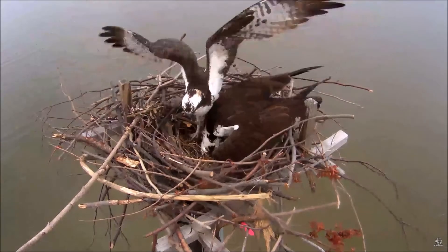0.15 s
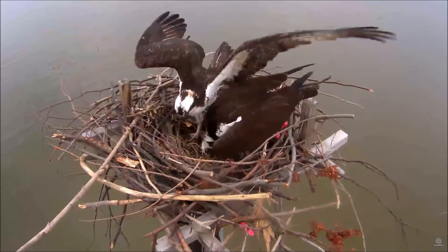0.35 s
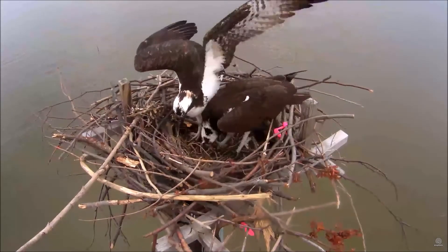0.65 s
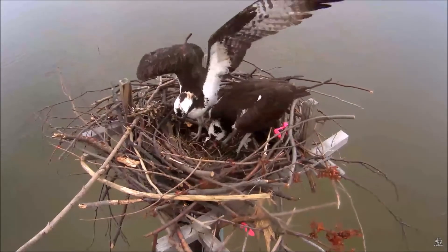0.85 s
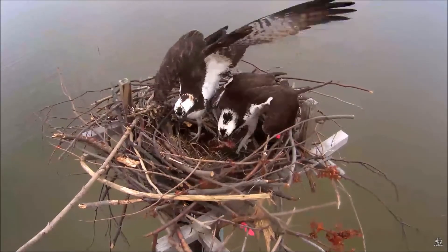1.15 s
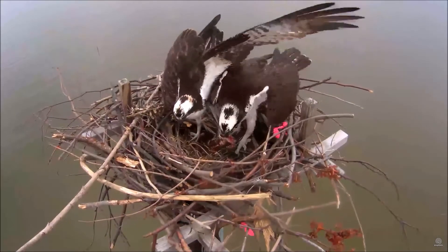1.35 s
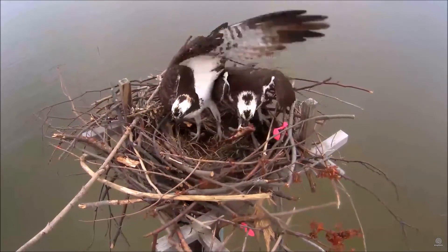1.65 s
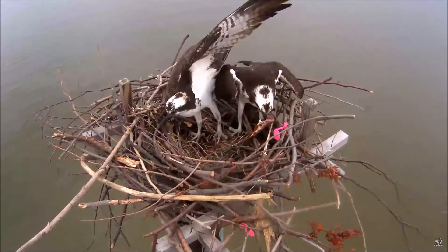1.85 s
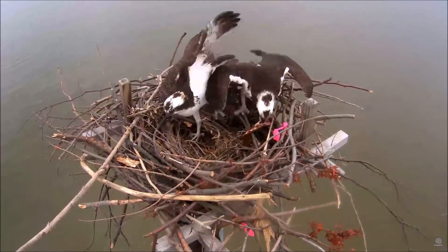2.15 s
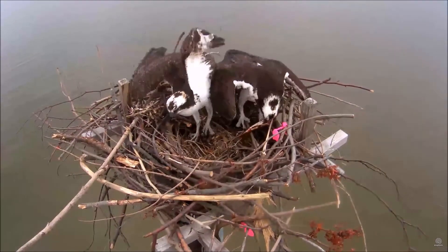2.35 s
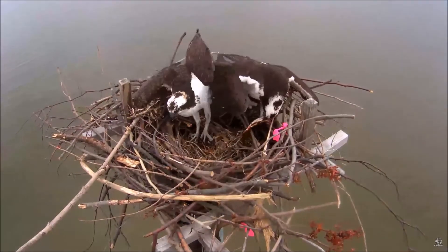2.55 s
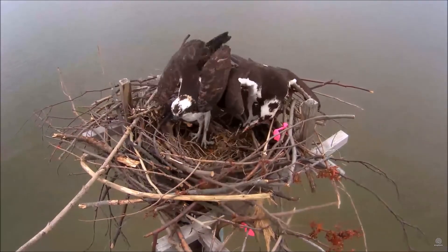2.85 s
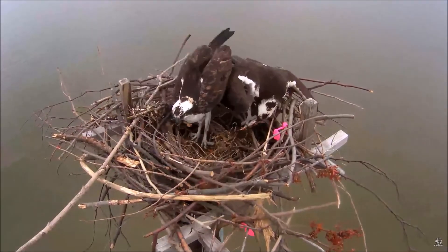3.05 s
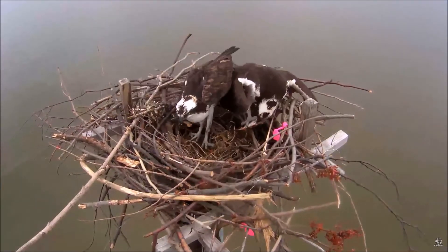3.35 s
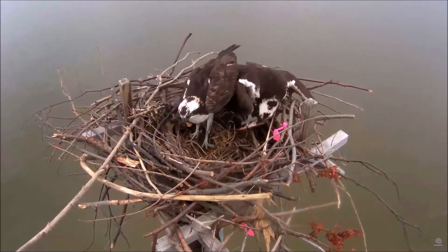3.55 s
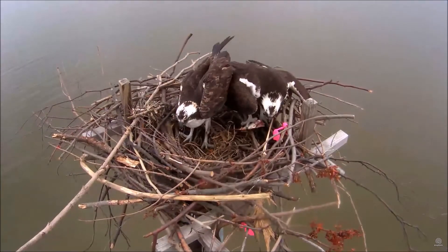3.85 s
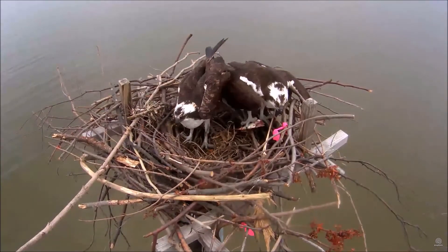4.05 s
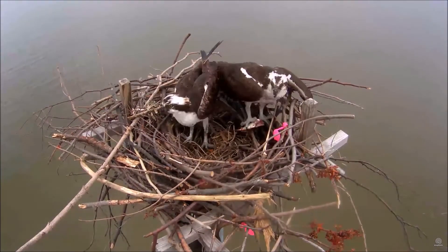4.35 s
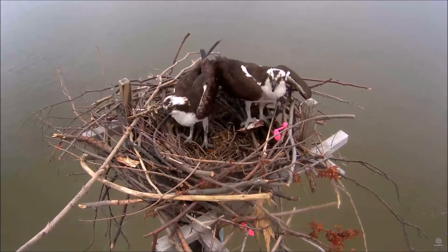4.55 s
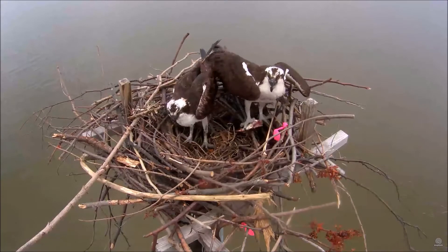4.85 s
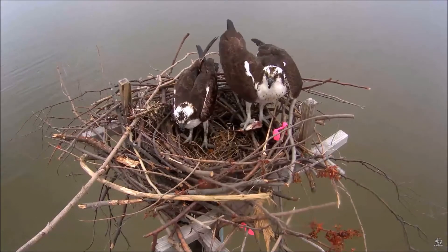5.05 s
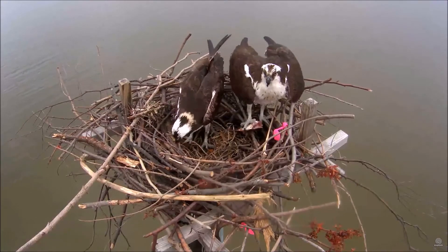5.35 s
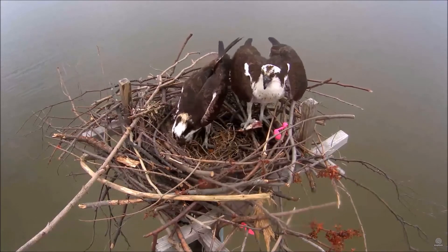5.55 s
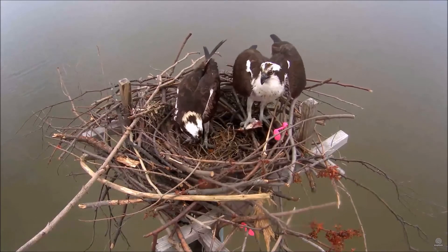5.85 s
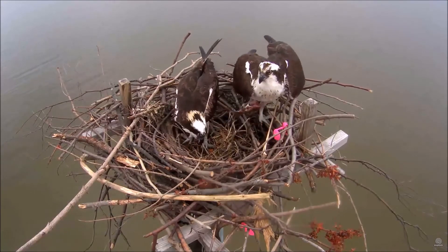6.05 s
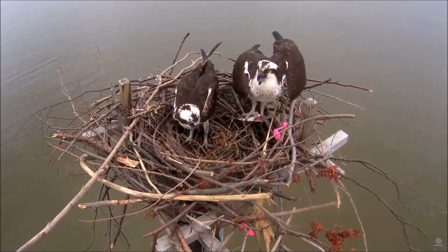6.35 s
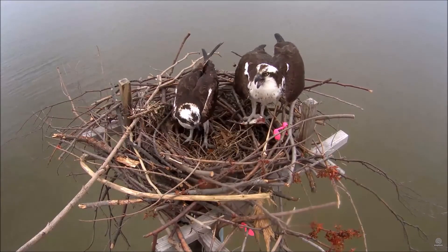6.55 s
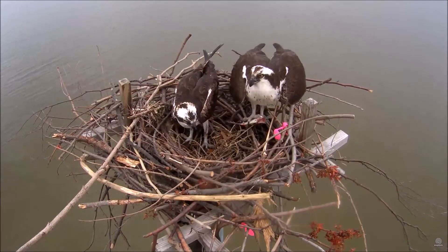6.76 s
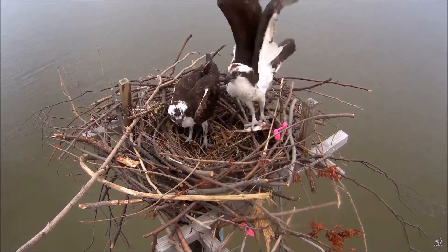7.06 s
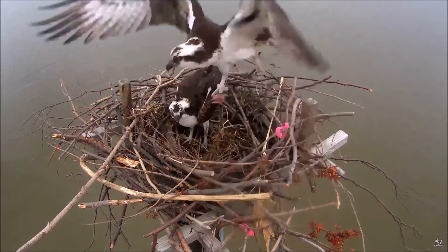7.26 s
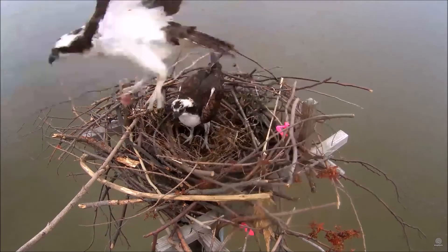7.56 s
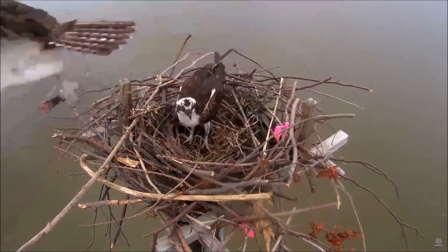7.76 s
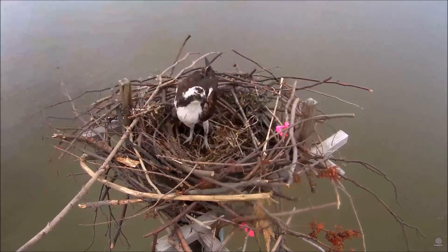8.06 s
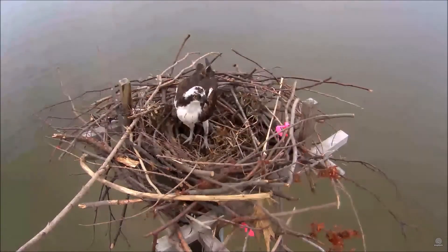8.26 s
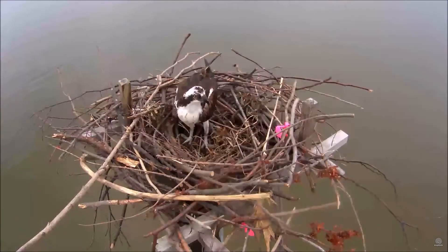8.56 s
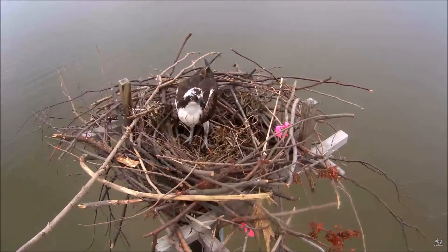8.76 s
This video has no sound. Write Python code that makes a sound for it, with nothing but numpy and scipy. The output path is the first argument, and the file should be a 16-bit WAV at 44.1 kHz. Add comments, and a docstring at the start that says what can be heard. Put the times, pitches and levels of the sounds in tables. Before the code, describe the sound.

Close to a stick nest over open water, an osprey gives faint raspy croaks and broken, squeaky chirps with short falling chips. Three long piercing whistles then climb in pitch, the first briefly chopped by two dropouts. A broken note follows, then hollow thumps as a bird takes off, and a weak final chirp. Sticks rustle throughout over soft hiss.

```python
"""Raspy croaks and broken chirps of an osprey open the scene, on a stick nest on a pole over open water.
From 4.6 s come three long rising whistles; during the first the whole sound cuts out twice, a stream
glitch. Broken notes and chips close it. The voice is summed partials, with breath noise coloured by fixed
resonances of the microphone housing, heard with its echoes. All along, feet and wings shake the nest:
noise bursts ring the modes of the hollow mount. A band-limited hiss of water and microphone lies below."""
import sys
import numpy as np
from scipy import signal
from scipy.fft import rfft, irfft, next_fast_len
from scipy.io import wavfile
from scipy.ndimage import uniform_filter1d, map_coordinates

SR = 44100
rng = np.random.default_rng(int(sys.argv[2]) if len(sys.argv) > 2 else 0)


def output_pcm(signal):
    """Save a mono or channel-first signal as 16-bit PCM at the path in sys.argv[1].

    Samples are clipped to [-1, 1] before scaling.
    """
    pcm = np.clip(np.atleast_2d(signal).T, -1, 1) * 32767
    wavfile.write(sys.argv[1], SR, np.round(pcm).astype(np.int16))


def volts_from_db(level):
    """Convert decibel levels to linear amplitude ratios."""
    exponent = np.asarray(level, float) / 20
    return 10 ** exponent


N = 393350  # samples

# Levels in the tables are drive levels, before flutter, shaping and mix gains.
# long rising whistles, breakpoints per note: start_s, pitch_hz, second_partial_db
RISING_NOTES = [
    [(4.597, 2223, -75), (4.606, 2236, -51), (4.624, 2295, -52), (4.639, 2387, -29), (4.737, 2557, -38.5),
     (4.759, 2596, -25), (4.78, 2650, -29), (4.847, 2745, -22.5), (4.905, 2803, -25), (4.947, 2785, -24),
     (4.958, 2720, -16.5), (4.97, 2610, -31), (4.993, 2560, -80)],
    [(5.628, 2240, -70), (5.637, 2250, -45), (5.648, 2335, -36), (5.67, 2400, -39), (5.74, 2588, -30),
     (5.804, 2686, -24.5), (5.842, 2745, -22), (5.898, 2793, -35), (5.958, 2824, -30.5), (5.975, 2796, -36),
     (5.985, 2720, -18), (5.997, 2615, -29), (6.02, 2560, -74)],
    [(6.402, 2270, -80), (6.414, 2350, -36.5), (6.434, 2480, -34.5), (6.47, 2535, -27), (6.5, 2540, -37),
     (6.526, 2629, -28.5), (6.592, 2732, -26.5), (6.608, 2767, -39.5), (6.632, 2792, -31),
     (6.698, 2869, -30), (6.726, 2854, -28), (6.735, 2780, -36), (6.741, 2730, -20), (6.75, 2620, -44),
     (6.77, 2620, -72)],
]
# basic fundamental level of each rising whistle: level_db
RISING_STRENGTH = [-23.5, -22, -22]
# how the fundamental carries, with a narrow dip, perhaps a cancelling reflection: pitch_hz, level_db
PITCH_CARRY = [(2230, -30), (2400, -18), (2500, -9), (2590, -3), (2630, -5), (2680, 0), (2720, -4),
               (2760, -13), (2790, 1), (2815, -1.5), (2860, -.6)]
# broken, wandering notes, breakpoints per note: start_s, pitch_hz, fundamental_db, second_partial_db
BROKEN_NOTES = [
    [(1.88, 2847, -47, -54), (1.888, 2873, -40, -40), (1.912, 2905, -34, -45), (1.968, 2904, -38, -45),
     (2.02, 2960, -35, -29), (2.132, 2996, -38, -36), (2.168, 3108, -27, -53), (2.172, 3161, -27, -68),
     (2.182, 3193, -26, -52), (2.196, 3194, -26, -65), (2.206, 3215, -33, -61), (2.212, 3188, -42, -70)],
    [(3.61, 2590, -68, -85), (3.622, 2625, -23.5, -30), (3.65, 2675, -19, -27.5), (3.832, 2717, -26.5, -28),
     (3.856, 2800, -29, -31), (3.868, 2825, -39, -32), (3.908, 2825, -40, -37), (3.926, 2787, -28, -25.5),
     (3.942, 2740, -23.5, -23.5), (3.96, 2655, -22, -40), (3.967, 2700, -44, -53), (3.98, 2750, -55, -68)],
    [(7.024, 2283, -75, -75), (7.036, 2347, -46, -32), (7.06, 2500, -31, -36.5),
     (7.084, 2552, -26.5, -28.5), (7.124, 2555, -30.5, -31.5), (7.15, 2660, -27, -25),
     (7.171, 2695, -23.5, -21.5), (7.177, 2800, -32.5, -42), (7.192, 2790, -28, -29), (7.2, 2780, -50, -52),
     (7.212, 2710, -29, -18.5), (7.223, 2685, -25, -16.5), (7.23, 2690, -31.5, -37),
     (7.236, 2640, -30, -19), (7.242, 2520, -30, -34), (7.26, 2480, -50, -52)],
    [(2.722, 2772, -46, -63), (2.73, 2771, -35, -42), (2.74, 2841, -41, -41), (2.824, 2824, -46, -44),
     (2.868, 2784, -35, -48), (2.89, 2860, -50, -59), (2.898, 2901, -42, -80), (2.918, 3161, -47, -49),
     (2.925, 3160, -49, -56)],
    [(1.203, 3130, -61, -85), (1.217, 3200, -31, -61), (1.225, 3010, -47, -59), (1.232, 2940, -37, -57),
     (1.251, 2890, -36.5, -60), (1.271, 3040, -38.5, -42), (1.283, 3190, -44, -70),
     (1.305, 3180, -38.5, -69), (1.339, 3380, -74, -48)],
    [(0, 2650, -31, -58), (.008, 2560, -35.5, -46), (.014, 2560, -46, -55), (.03, 2580, -66, -88)],
    [(1.095, 2390, -58, -85), (1.105, 2490, -32, -39), (1.113, 2670, -36.5, -32.5),
     (1.119, 2702, -45, -41.5), (1.127, 2810, -32, -62), (1.137, 2800, -56, -73)],
    [(8.085, 2272, -66, -81), (8.105, 2300, -47, -66), (8.128, 2420, -35, -52), (8.14, 2470, -32, -62),
     (8.155, 2474, -31.5, -52), (8.177, 2440, -30.5, -55), (8.2, 2460, -36, -64), (8.211, 2430, -61, -79)],
    [(2.213, 3450, -52, -75), (2.22, 3420, -43, -66), (2.237, 3505, -57, -73), (2.26, 3740, -50, -75),
     (2.293, 4040, -42, -90), (2.307, 3800, -47, -81), (2.323, 3520, -55, -75)],
    [(2.922, 3150, -52, -55), (2.936, 3200, -61, -66), (2.97, 3870, -58, -79)],
]
# short chips, most of them falling: start_s, length_s, from_hz, to_hz, level_db, second_over_first_db
CLOSING_CHIPS = [(.887, .046, 2730, 2530, -29, -6), (1.453, .024, 3080, 2850, -33, -18),
                 (1.474, .048, 2830, 2620, -25, 0), (2.334, .04, 2740, 2650, -24, -11),
                 (3.118, .024, 2950, 2950, -35, -18), (3.136, .052, 2920, 2600, -22, -3),
                 (8.226, .08, 2570, 2480, -35, -6)]
# shape shared by all chips: share_of_length, share_of_glide, fundamental_db, second_partial_db
CHIP_CONTOUR = [(0, 0, -25, -30), (.2, .22, -4, -3), (.42, .62, 0, 0), (.57, 1, -1, -12),
                (.72, .9, -21, -30), (1, .7, -38, -48)]
# third partial over the second: third_partial_hz, level_db
THIRD_OVER_SECOND = [(6600, -16.5), (7100, -7), (7500, -22.5), (8000, -31), (8600, -54.5)]
# lines of a membrane that repeats only every fourth cycle: multiple_of_pitch, level_db over the rattle
RATTLE_LINES = [(.75, -5), (1.25, -12), (1.5, -14), (1.75, -2), (2.25, -7), (2.5, -10), (2.75, -12)]
# rattle over the low breath band, for each rising whistle, each broken note, then all chips: level_db
RATTLE_LEVELS = [1, 2, 4, -6, 1, 7, -7, -6, 0, -3, 0, -8, -10, -4]
# notes in the low register, breakpoints per note: start_s, pitch_hz, second_partial_db, third_partial_db
LOW_CROAKS = [
    [(0.125, 1719, -70, -60), (0.15, 1840, -46, -57), (0.231, 1820, -52.5, -55), (0.317, 1990, -50, -50),
     (0.383, 1997, -58, -42), (0.415, 1700, -59, -58.5)],
    [(0.565, 1810, -64, -82), (0.587, 1700, -63, -50), (0.629, 1700, -54.5, -57.5),
     (0.66, 1670, -69.5, -70.5)],
    [(0.68, 1800, -50, -66), (0.715, 1800, -50, -58), (0.752, 1820, -39.5, -49.5), (0.842, 1890, -49, -53),
     (0.868, 1870, -46, -55), (0.895, 1735, -48.5, -52)],
    [(1.128, 1810, -44, -65), (1.142, 1870, -25, -47), (1.176, 1834, -37.5, -42), (1.205, 1775, -61, -59)],
    [(1.86, 1970, -75, -88), (1.87, 2030, -44, -70), (1.884, 2160, -51, -83.5)],
    [(2.312, 2346, -53, -72.5), (2.324, 2377, -35.5, -72), (2.336, 2400, -44, -66)],
    [(2.703, 2007, -69, -78), (2.71, 2016, -43.5, -62), (2.727, 2090, -55, -77)],
    [(2.955, 1960, -61, -77), (2.99, 1995, -41, -66), (3, 2015, -32, -63), (3.1, 1975, -35, -58),
     (3.115, 1950, -30, -56), (3.133, 1915, -29, -58), (3.142, 1930, -53.5, -44)],
    [(8.193, 1984, -61, -73), (8.231, 2062, -51.5, -78), (8.247, 2090, -62, -73), (8.265, 2063, -75, -80)],
]
# fundamental of each croak over its second partial: level_db
CROAK_CHOKE = [-35, -35, -45, -50, 11, -6, 6, -40, 11]
# phase unsteadiness of each croak: smear_rad
CROAK_HOARSENESS = [1, .9, .3, .2, .1, .1, .1, .2, .1]
# turbulent breath: start_s, length_s, low_band_end_db, swell_db, middle_over_low_db, high_over_low_db
BREATHS = [(.13, .29, -71, 5, 16, 20), (.57, .09, -80, 0, 21, 16), (.705, .2, -69, -2, 9, 5),
           (1.095, .04, -66, 0, 5, 0), (1.12, .125, -61, -10, 11, -1), (1.225, .12, -72, 0, 5, 8),
           (1.33, .19, -60, 2, 8, 4), (1.865, .35, -54, 3, 9, -6), (2.195, .17, -63, 3, 17, 3),
           (2.715, .255, -58, 0, 8, 2), (2.95, .17, -50, 4, 6, -5), (3.1, .09, -59, -8, 10, 7),
           (3.61, .365, -54, 7, 9, 5), (4.605, .385, -49, 28, -3, 2), (5.63, .2, -54, 12, -1, 2),
           (5.81, .205, -52, 0, 3, 8), (6.404, .2, -66, -3, 8, 6), (6.585, .18, -56, -1, 3, 10),
           (7.025, .165, -53, 4, 1, 7), (7.17, .055, -46, 0, 2, 11), (7.21, .075, -56, 0, 4, 2),
           (8.1, .19, -82, -4, 14, 5)]
# share of the breath's swell in the high, middle and low band: share
BREATH_SWELL_SHARE = [.8, .4, 1]
# housing resonances that colour the rasp, low to high, each applied twice:
# center_hz, single_pass_width_hz, level_db
RASP_MODES = [(1650, 90, -19.5), (2093, 110, -1), (2510, 190, 7), (2700, 320, 8), (3154, 140, 3.5),
              (3840, 83, -3), (3998, 210, -11), (4497, 130, -1.5), (4756, 110, -1.5), (5145, 240, -4),
              (5360, 350, -7), (6010, 230, -6), (6467, 190, -5.5), (6834, 120, -5), (7230, 220, -14.5)]
# modes of the hollow mount: center_hz, width_hz, level_db
MOUNT_MODES = [(44.6, 70, -26.5), (177.9, 56, -18.5), (281.4, 12.3, -1), (404, 50, -10), (745, 49, -5),
               (995, 61, -14.5), (1195, 31, -5), (1507, 29, -15.5), (1657, 42, -13.5), (1987, 50, -13),
               (2416, 120, -13.5), (2820, 87, -17.5), (3860, 290, -26.5), (4640, 130, -23),
               (5600, 400, -21.5), (6990, 180, -25.5)]
# contacts with the mount: start_s, level_db, brightness_db_per_octave, long_ring_db
NEST_TAPS = [(0.072, -44, -4, -30), (0.723, -40, -6.5, -15.5), (0.823, -32.5, -8.5, -29),
             (1.216, -43, 0, 4), (1.332, -48, 0.5, -19), (1.529, -34.5, -11, -9), (1.691, -36.5, -4, -7),
             (1.757, -26, -8.5, -11.5), (2.09, -36, -11.5, -3), (2.425, -45, -22.5, -24),
             (3.017, -35.5, -8.5, -14), (3.932, -21.5, -4.5, -9.5), (4.136, -40.5, -5.5, -8.5),
             (6.068, -40.5, -14, -25), (6.607, -35, -1, -10), (7.358, -19, -7, -11), (7.385, -39, -10, -20),
             (7.474, -18, -11, -26), (7.823, -21, 1, -6)]
# sticks shifting: peak_s, level_db, brightness_db_per_octave, time_to_fall_20_db_s
STICK_SCUFFS = [(.07, -54, -7.5, .07), (.74, -47.5, -4, .15), (.85, -53, -7, .7), (1.1, -56, -6, .1),
                (1.24, -50, -4, .2), (1.34, -49.5, -1, .15), (1.55, -50, -5, .2), (1.76, -44.5, -4.5, .17),
                (2.11, -51.5, -3.5, .4), (2.4, -58, -14, .15), (2.58, -56.5, -4, .2), (3.43, -60, -8.5, .1),
                (3.86, -60, 3, .06), (3.955, -47, -7.5, .1), (4.8, -65.5, -4.5, .1), (5.81, -60, -12, .08),
                (6.18, -57, -3.5, .08), (6.31, -61, 0, .4), (6.66, -58.5, -9, .2), (7.22, -58, 2, .2),
                (7.3, -42, -3, .35), (7.37, -44, -1, .12), (7.44, -49, -3, .08), (7.52, -55, -6, .25),
                (7.84, -47, -9, .08)]
# steady creak of the nest: time_s, level_db
NEST_CREAK = [(0, -72), (1, -64), (3.3, -66), (3.6, -72), (5.7, -72), (7.1, -66), (7.7, -72), (9, -74)]
# relative spectrum of water and microphone hiss: frequency_hz, density_db_per_hz
HISS_SPECTRUM = [(15, -62.5), (25, -22), (103, -7.5), (151, -5.5), (349, -6.5), (433, -6), (551, -9.5),
                 (848, -17.5), (1130, -18), (1440, -20.5), (3170, -20.5), (5770, -13), (7690, -22.5),
                 (10000, -60), (16900, -120)]
# moments at which the whole sound cuts out: start_s
DROPOUTS = [4.78650, 4.80785]


def unit(x):
    """Scales a signal to rms 1."""
    return x / np.sqrt(np.mean(x ** 2) + 1e-20)


def wobble(n, rate_hz):
    """Interpolates random knots, rate_hz of them a second, into a smooth curve."""
    knots = rng.standard_normal(int(n * rate_hz / SR) + 4)
    return map_coordinates(knots, [np.arange(n) * rate_hz / SR])


def fade(n, edge_s):
    """Rounds both ends with squared-sine ramps."""
    k = np.arange(n)
    ramp = np.clip(np.minimum(k, n - k) / (edge_s * SR), 0, 1)
    return np.sin(np.pi / 2 * ramp) ** 2


def filtered(x, response):
    """Multiplies the spectrum by a response of frequency."""
    size = next_fast_len(len(x) + SR // 2)
    spectrum = rfft(x, size) * response(np.fft.rfftfreq(size, 1 / SR))
    return irfft(spectrum, size)[:len(x)]


def resonance(center_hz, width_hz, level_db, f):
    """Causal response of one damped mode."""
    damping = 1j * f * width_hz
    return volts_from_db(level_db) * damping / (center_hz ** 2 - f ** 2 + damping)


def smoothed_controls(rows):
    """Start sample and control curves of a note, smoothed: muscles need a few ms to move."""
    s, *columns = np.transpose(rows)
    start = round(s[0] * SR)
    t = np.arange(start, min(round(s[-1] * SR), N)) / SR
    curves = [np.interp(t, s, column) for column in columns]
    for _ in range(2):
        curves = uniform_filter1d(curves, size=100, mode="nearest")
    return start, curves


def voice(table):
    """Yields place, pitch, membrane phase and partial levels; the phase accumulates the pitch."""
    for rows in table:
        start, (hz, *levels) = smoothed_controls(rows)
        yield slice(start, start + len(hz)), hz, 2 * np.pi * np.cumsum(hz) / SR, levels


def partial(phase, level_db, flutter_db, smear_rad):
    """One sine line of the voice; level flutters, and phase wobble widens the line."""
    n = len(phase)
    level = volts_from_db(level_db + flutter_db * wobble(n, 120))
    return np.sqrt(2) * fade(n, 0.0025) * level * np.sin(phase + smear_rad * wobble(n, 200))


def rising_whistles():
    """Long climbs whose fundamental follows how each pitch carries, swelling in and dying out."""
    onset_s, release_s, edge_db = .012, .02, -25
    for (at, hz, phase, (second,)), strength_db in zip(voice(RISING_NOTES), RISING_STRENGTH):
        t = np.arange(len(hz)) / SR
        edges = edge_db * (np.clip(1 - t / onset_s, 0, 1) + np.clip(1 - t[::-1] / release_s, 0, 1))
        first = strength_db + edges + np.interp(hz, *np.transpose(PITCH_CARRY))
        yield at, hz, phase, (first, second)


def chips():
    """Note breakpoints for short calls that share one contour of glide and level."""
    return [[(start + share * length, from_hz + glide * (to_hz - from_hz),
              level_db + first_db, level_db + over_db + second_db)
             for share, glide, first_db, second_db in CHIP_CONTOUR]
            for start, length, from_hz, to_hz, level_db, over_db in CLOSING_CHIPS]


def whistled_notes(low_breath):
    """Phase-locked overtones, with fuzzy lines between them from the membrane's four-cycle repeat."""
    out = np.zeros(N)
    whistles = [*rising_whistles(), *voice(BROKEN_NOTES + chips())]
    for n, (at, hz, phase, (first, second)) in enumerate(whistles):
        third = second + np.interp(3 * hz, *np.transpose(THIRD_OVER_SECOND))
        out[at] += partial(phase, first, .3, .02)
        out[at] += partial(2 * phase + 4, second, .5, .04)
        out[at] += partial(3 * phase, third, 1.2, .1)
        rattle = sum(partial(k * phase, db, 4, .65) for k, db in RATTLE_LINES)
        rattle_db = RATTLE_LEVELS[min(n, len(RATTLE_LEVELS) - 1)]
        out[at] += volts_from_db(rattle_db) * low_breath[at] * rattle
    return out


def croaks():
    """Low-register notes of three partials, the third the hoarsest."""
    out = np.zeros(N)
    for (at, _, phase, (second, third)), choke_db, hoarse in zip(
            voice(LOW_CROAKS), CROAK_CHOKE, CROAK_HOARSENESS):
        out[at] += partial(phase, second + choke_db, .8, .1)
        out[at] += partial(2 * phase, second, 4 * hoarse, hoarse)
        out[at] += partial(3 * phase, third, 3, .7 + hoarse)
    return out


def turbulence():
    """Gains of throat air in the high, middle and low band, each swelling by its own share."""
    gains = np.zeros((3, N))
    for start, length, low_db, swell_db, middle_db, high_db in BREATHS:
        n = round(length * SR)
        band_db = np.array([[high_db], [middle_db], [0]])
        swell = swell_db * np.outer(BREATH_SWELL_SHARE, np.linspace(1, 0, n))
        gains[:, round(start * SR):][:, :n] += volts_from_db(low_db + band_db - swell) * fade(n, .02)
    return gains


def rasp(tone, breath):
    """Breath noise coloured by fixed housing resonances; high, middle and low groups are driven apart."""
    # a strong tone smooths the air near its pitch
    clear = 1 / (1 + uniform_filter1d(np.abs(tone), size=900) / volts_from_db(-35))
    out = np.zeros(N)
    for gain, modes in zip(breath, (RASP_MODES[11:], RASP_MODES[6:11], RASP_MODES[:6])):
        hiss = rng.standard_normal(N) * volts_from_db(2 * wobble(N, 60))
        for hz, width, level_db in modes:
            band = unit(filtered(hiss, lambda f: resonance(hz, width, 0, f) ** 2))
            band = band * volts_from_db(level_db + 1.5 * wobble(N, 12))
            out += gain * band * (clear if 2300 < hz < 4100 else 1)
    return out


def echo(x, t60_s, delay_s):
    """A diffuse reflection: convolution with noise that decays 60 dB in t60_s."""
    t = np.arange(SR) / SR
    tail = rng.standard_normal(SR) * volts_from_db(-60 * t / t60_s) * (t > delay_s)
    return signal.fftconvolve(x, tail / np.linalg.norm(tail))[:N]


def bird_echoes(bird):
    """Returns off the sticks and water, and a late one off the shore with its treble lost in the air."""
    near = volts_from_db(-25) * echo(bird, t60_s=.09, delay_s=.002)
    water = volts_from_db(-41.5) * echo(bird, t60_s=.6, delay_s=.023)
    shore = np.pad(echo(bird, t60_s=.12, delay_s=0), (round(.27 * SR), 0))[:N]
    shore = volts_from_db(-48) * filtered(shore, lambda f: 1 / (1 + (f / 4500) ** 4))
    return near + water + shore


def shifting_sticks():
    """Level (dB) and brightness (dB per octave) of moving sticks; the loudest scuff sets the colour."""
    build_s, creak_tilt_db = .05, -2  # time to build up 20 dB; tilt per octave
    t = np.arange(N) / SR
    power = volts_from_db(2 * np.interp(t, *np.transpose(NEST_CREAK)))
    weighted_tilt = power * creak_tilt_db
    for peak_s, level_db, bright, fall_s in STICK_SCUFFS:
        away = np.maximum((peak_s - t) / build_s, (t - peak_s) / fall_s)
        scuff = volts_from_db(2 * (level_db - 20 * away))
        power = power + scuff
        weighted_tilt = weighted_tilt + scuff * bright
    return 10 * np.log10(power), weighted_tilt / power


def nest():
    """Scuffs and taps shake the mount's modes; a harder contact reaches the higher ones."""
    level_db, bright = shifting_sticks()
    clumps_db = 2 * wobble(N, 70) + 2 * wobble(N, 400)  # stick slips come in bunches
    octaves = np.clip(np.log2(np.array(MOUNT_MODES)[:, 0] / 700), -1, None)
    t = np.arange(SR // 2) / SR
    burst_shape = volts_from_db(-60 * t / .019) * (1 - np.exp(-t / .0033))
    bursts = rng.standard_normal((len(NEST_TAPS), len(t))) * burst_shape
    out = np.zeros(N + SR)
    for k, (mode, octave) in enumerate(zip(MOUNT_MODES, octaves)):
        # each mode is caught by other slips
        grains = unit(rng.standard_normal(N) * volts_from_db(clumps_db + 3.5 * wobble(N, 50)))
        push = grains * volts_from_db(level_db + 23.5 + (bright + 2) * octave)
        for (s, tap_db, tilt, _), burst in zip(NEST_TAPS, bursts):
            push[round(s * SR):][:len(t)] += burst * volts_from_db(tap_db + 22 + (tilt + 6) * octave)
        # neighbouring modes answer in opposite polarity
        out[:N] += (-1) ** k * filtered(push, lambda f: resonance(*mode, f))
    ring_hz, ring_t60_s = 1235, .21  # the mount's least damped mode
    ring = np.sin(2 * np.pi * ring_hz * t) * volts_from_db(-60 * t / ring_t60_s) * (1 - np.exp(-t / .0016))
    for s, tap_db, _, ring_db in NEST_TAPS:
        out[round(s * SR):][:len(t)] += volts_from_db(tap_db + ring_db - 9) * ring
    return out[:N]


def air():
    """Shaped noise for water and microphone, with slow, shallow swells and the capsule's treble peak."""
    hz, density_db = np.transpose(HISS_SPECTRUM)

    def colour(f):
        capsule_db = 6 * np.exp(-((f - 6010) / 110) ** 2)
        return volts_from_db(np.interp(np.log(f + 1), np.log(hz + 1), density_db) + capsule_db)

    hiss = unit(filtered(rng.standard_normal(N), colour))
    return volts_from_db(-64.5 + 0.6 * wobble(N, 2)) * hiss


def scene():
    """Mixes the bird and its echoes with the nest and the air."""
    breath = turbulence()
    tone = whistled_notes(breath[2]) + croaks()
    bird = tone + rasp(tone, breath)
    return (bird + bird_echoes(bird) + nest() + air())[None]


def top_cut(x):
    """Nothing passes above the cut-off."""
    return signal.sosfilt(signal.butter(12, 15719, fs=SR, output="sos"), x)


def record(dry):
    """Steep band limit, then stream glitches that cut hard and ramp back smoothly, then converter noise."""
    cutoff_hz, return_s = 7650, .019
    x = filtered(dry[0], lambda f: 1 / (1 + (f / cutoff_hz) ** 60))
    t = np.arange(N) / SR
    for s in DROPOUTS:
        ramp = np.sin(np.pi / 2 * np.clip((t - s) / return_s, 0, 1)) ** 1.5
        x = x * np.where(t < s, 1, ramp)
    x = x + volts_from_db(-91.5) * rng.standard_normal(N)
    return top_cut(x[None])


dry = scene()
out = record(dry)
output_pcm(out)
```